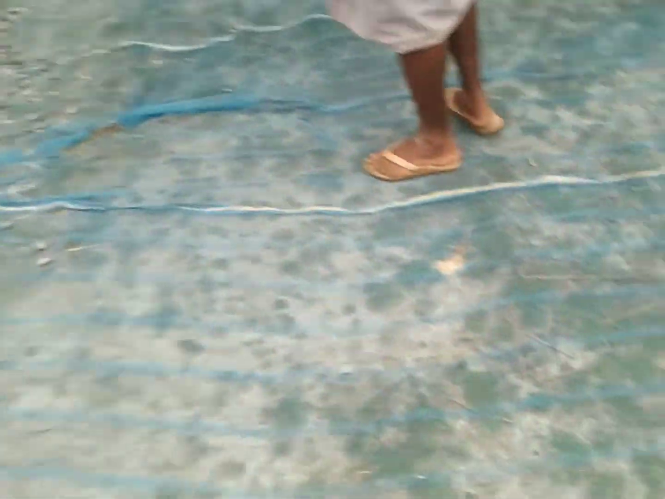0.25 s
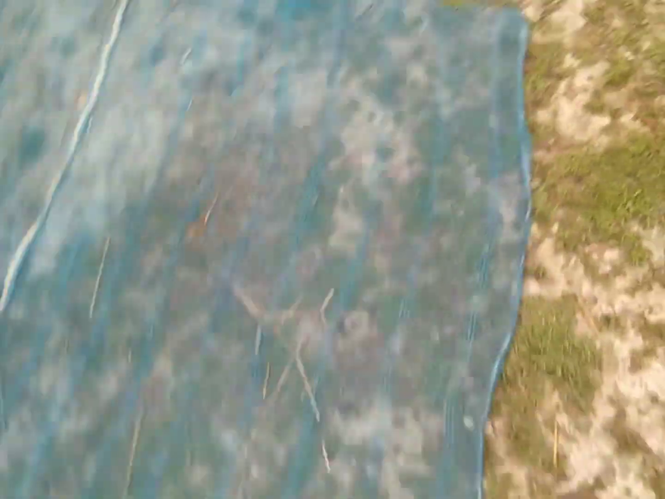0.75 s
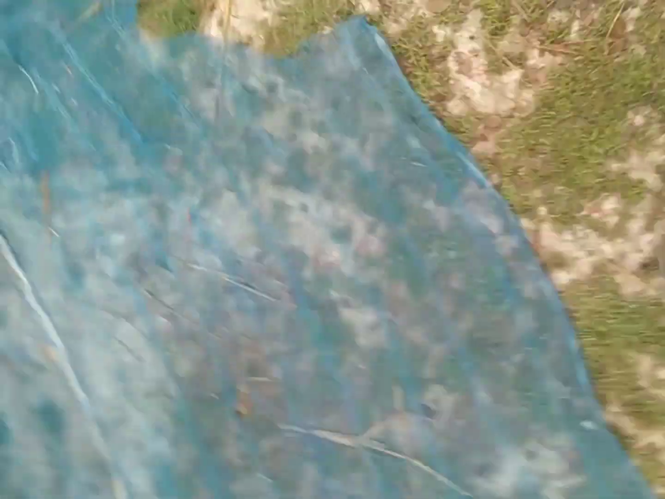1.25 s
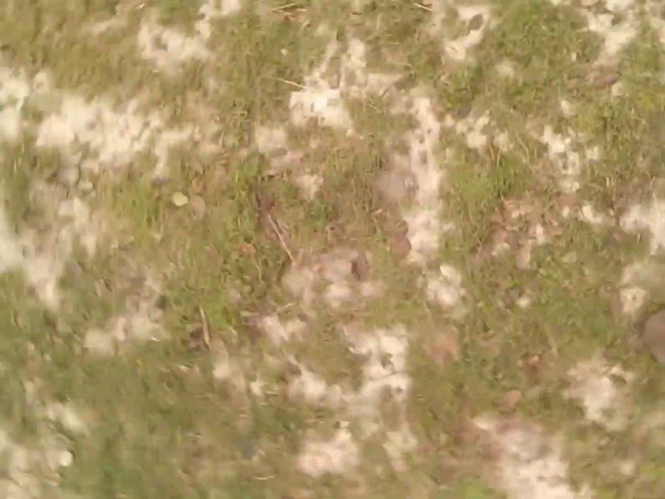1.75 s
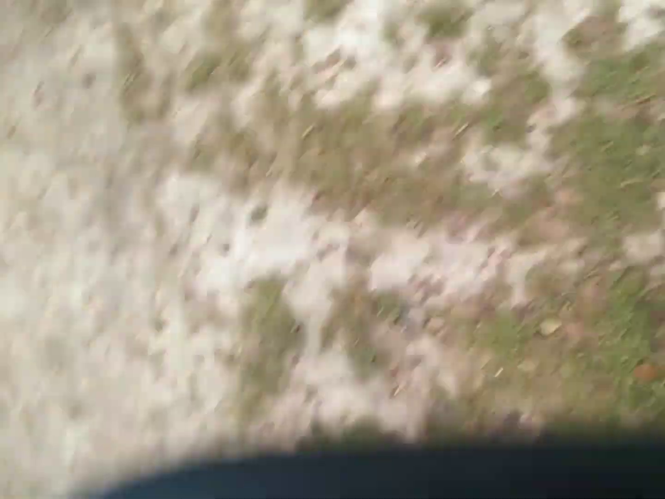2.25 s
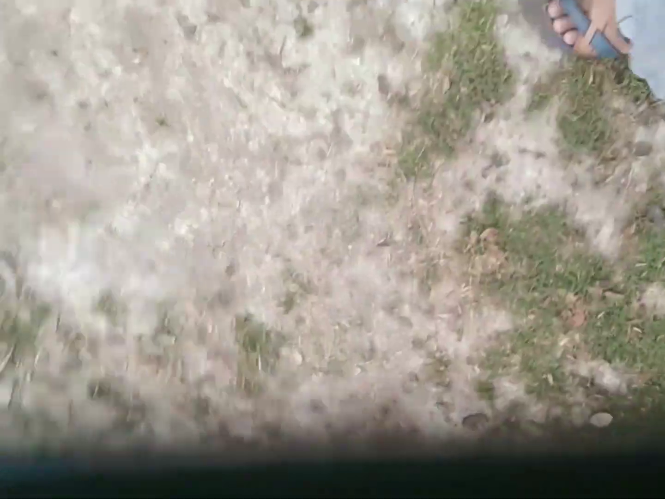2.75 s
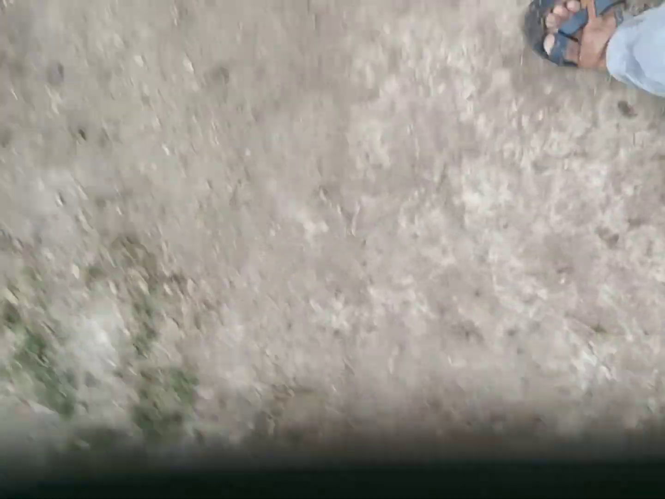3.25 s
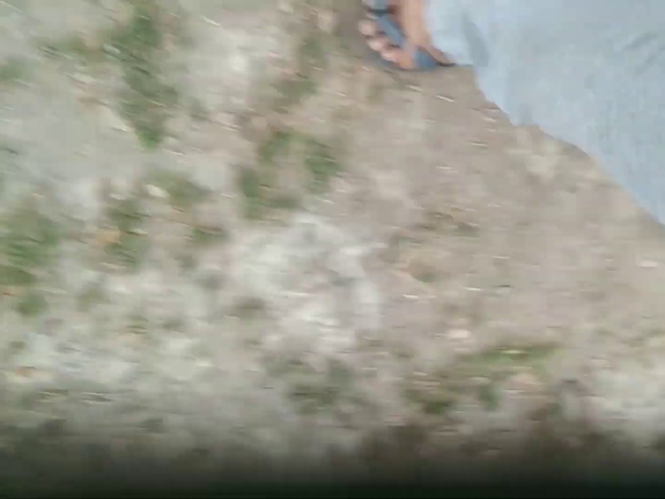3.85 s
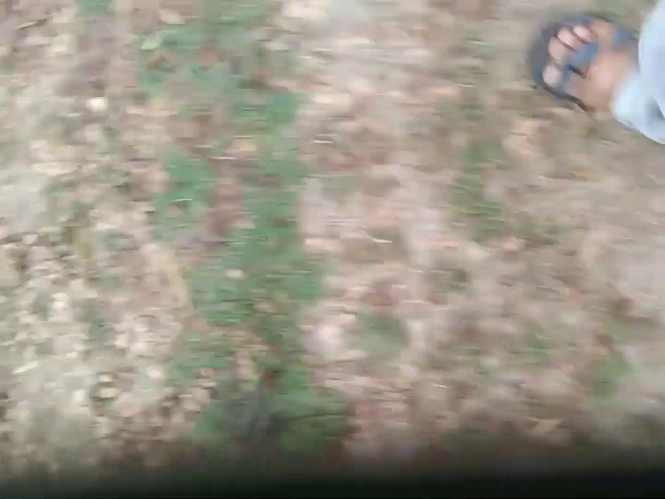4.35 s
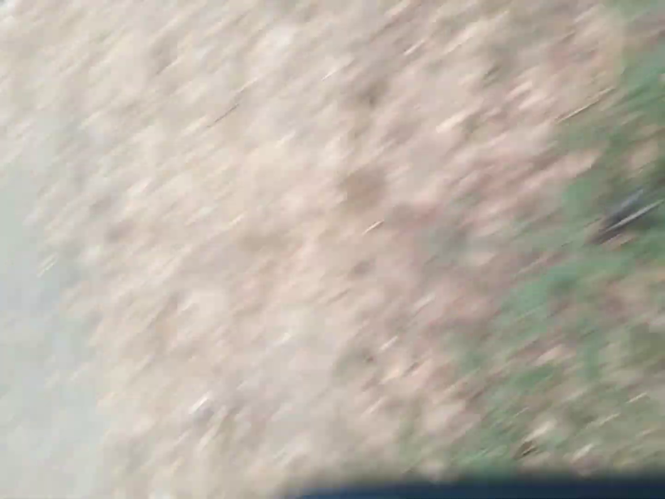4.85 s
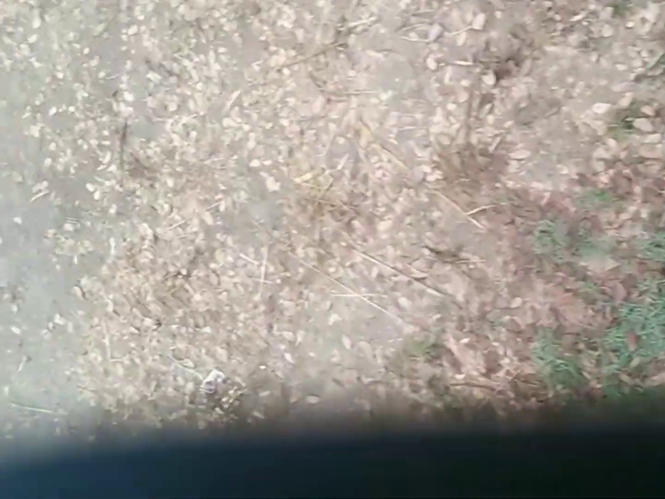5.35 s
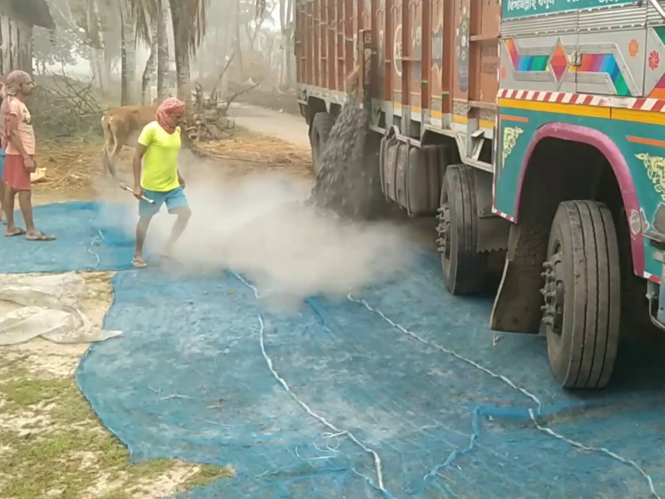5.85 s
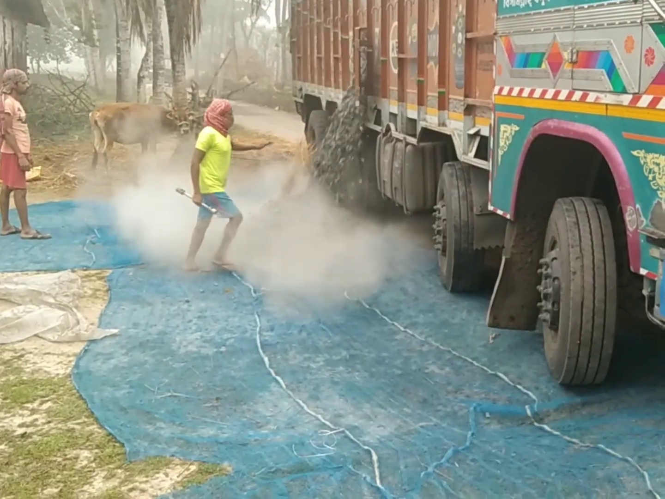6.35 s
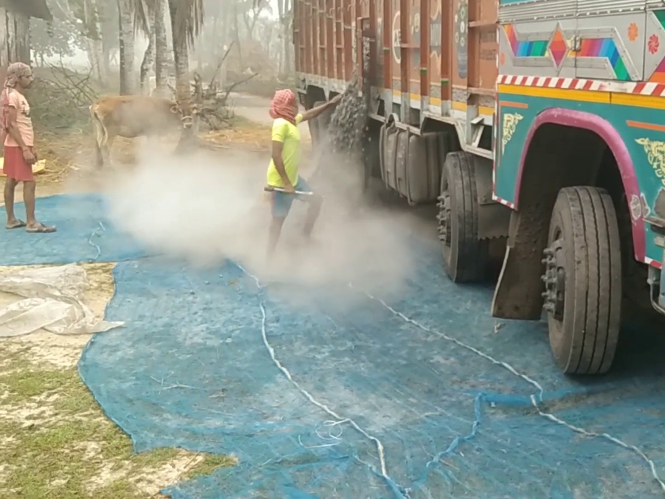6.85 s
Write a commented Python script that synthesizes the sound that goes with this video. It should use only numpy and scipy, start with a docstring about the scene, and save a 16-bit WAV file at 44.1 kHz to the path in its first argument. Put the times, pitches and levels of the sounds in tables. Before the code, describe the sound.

Outdoors, crushed stone pours from a truck's side with a dense gritty hiss over a duller rattle. Close chips tick sharply at first. The phone is carried along pointing down, so a hand muffles and hollows the hiss, with low bumps and dull clatters. It brightens briefly near five seconds, dims, and cuts to a tiny silence. Then the pour fades in quickly, steady, bright and much louder.

```python
"""A dense hiss of colliding chips over a duller rattle: crushed stone pours off a truck's side onto a pile outdoors.
A phone is carried past it, pointing down; the hand shades its microphone, sweeps notches through the hiss and bumps it.
After a short silence the pour fades in again, heard steadily from beside the cab.
The stone is made of many short random rings over noise, filtered; rumble and midrange swells are filtered noise,
close chips are decaying sines with a crack, and bumps are low swells of a few cycles."""
import sys
import numpy as np
from scipy import signal
from scipy.fft import rfft, irfft, next_fast_len
from scipy.io import wavfile
from scipy.ndimage import uniform_filter1d, map_coordinates

SR = 44100
rng = np.random.default_rng(int(sys.argv[2]) if len(sys.argv) > 2 else 0)


def waveform_to_disk(signal):
    """Save audio, clipped to [-1, 1], as 16-bit WAV at the path in sys.argv[1]."""
    frames = np.transpose(np.atleast_2d(signal))
    scaled = np.clip(frames, -1, 1) * 32767
    samples = np.round(scaled).astype(np.int16)
    wavfile.write(sys.argv[1], SR, samples)


N = 313551
T = np.arange(N) / SR  # s

# the hiss brightens when the microphone turns to the stream: start_s, upper_over_lower_hiss_db
AIM_CURVE = [(0, -0.5), (.48, 2), (1.05, -3.5), (1.8, -2), (2.6, 0), (4.58, -3), (4.9, 3), (5.2, -0.5),
             (5.77, 0.5)]


def amp(db):
    """Decibels to gain."""
    return 10 ** (np.asarray(db) / 20)


def unit(x):
    """Scale to rms 1."""
    return x / np.sqrt(np.mean(x ** 2) + 1e-20)


def along(points, hz):
    """Read (Hz, value) points on a log frequency axis."""
    point_hz, values = np.transpose(points)
    return np.interp(np.log(hz + 1), np.log(point_hz + 1), values)


def curves(rows, at):
    """Each column after the time, read at the given times."""
    s, *columns = np.transpose(rows)
    return [np.interp(at, s, column) for column in columns]


def wobble(rate):
    """A smooth random curve, rate knots a second."""
    return map_coordinates(rng.standard_normal(4096), [T * rate], mode="wrap")


def coloured(x, gain_db):
    """Filter x by a function from Hz to dB."""
    size = next_fast_len(N + SR // 4)
    gain = amp(gain_db(np.fft.rfftfreq(size, 1 / SR)))
    return irfft(rfft(x, size) * gain, size)[:N]


def add(track, s, sound):
    """Mix a short sound into the track at s seconds."""
    part = track[max(0, round(s * SR)):][:len(sound)]
    part += sound[:len(part)]


def collisions(top_hz, t60, spread_db, blur_db, count, size):
    """Stone on stone: brief rings of random pitch and strength over a noise blur of countless weaker ones."""
    when, pitch = rng.random((count, 2)).T
    strength = amp(spread_db * np.minimum(rng.standard_normal(count), 2.7))
    t = np.arange(size) / SR
    decays = np.outer(strength, amp(-60 * t / t60))
    rings = np.sin(2 * np.pi * top_hz * np.outer(pitch, t)) * decays
    index = (when * N).astype(int)[:, None] + np.arange(size)
    near = np.bincount(index.ravel(), rings.ravel(), N)[:N]
    blur = amp(blur_db) * rng.standard_normal(N)
    return unit(unit(near) + blur)


def pour_walking():
    """Stone slides in clumps: heavy pieces rattle, small chips hiss, grit fizzes; more exposure is brighter."""
    # how openly the stream reaches the carried microphone, as the level of its hiss: start_s, level_db
    exposure = [(0, -19.5), (.63, -21.5), (.85, -18.5), (1.1, -24), (1.35, -31), (1.53, -28.5),
                (2.05, -36.5), (2.27, -26), (2.75, -26.5), (2.85, -31.5), (3.02, -29), (3.38, -37.5),
                (3.83, -38), (3.96, -40.5), (4.75, -35), (4.89, -22.5), (5.09, -21), (5.76, -35)]
    # sound of the heavy pieces, which bends round the hand: start_s, level_db before a small trim
    rattle_level = [(-0.0, -37.5), (0.38, -39.5), (0.66, -33), (1.33, -37), (2.19, -34), (2.77, -37.5),
                    (3.18, -45), (3.87, -38.5), (4.35, -42.5), (4.55, -32), (4.83, -35.5), (5.13, -31.5),
                    (5.76, -43.5)]
    # brief gushes of small chips: centre_s, rise_db, half_length_s
    gushes = [(4.274, 6, 0.021), (4.578, 6.5, 0.077), (4.912, 3.5, 0.013), (5.042, 2, 0.022),
              (5.434, 2.5, 0.059)]
    # spectral shapes of heavy pieces, small chips and grit: pitch_hz, relative_db per Hz
    rattle_shape = [(25, -53.5), (60, -7.5), (120, -11), (220, -5), (450, 0), (750, -0.5), (1050, -1),
                    (1600, -1.5), (2100, -7), (2700, -4.5), (3600, -13.5), (6000, -44)]
    hiss_shape = [(600, -44), (1500, -16.5), (2500, -6.5), (3300, -3.5), (4200, -1), (5200, 1.5),
                  (6500, 2.5), (7800, 3.5), (8700, -3.5), (9800, -15.5), (11500, -21), (14000, -48)]
    fizz_shape = [(7000, -29), (9000, 4.5), (10500, -1.5), (12000, -7), (13500, -10.5), (15400, -13.5)]
    half_shaded_db = -29.5  # the exposure at which the grit's level is given
    # fine grit is shaded first: its level (dB), dB per dB of exposure, dB per dB of aim
    fizz_level_db, fizz_grows, fizz_aimed = -43.5, 1.18, 0.85
    rattle_trim_db = 0.04

    exposure_db, = curves(exposure, T)
    rattle_db, = curves(rattle_level, T)
    aim_db, = curves(AIM_CURVE, T)
    gush_db = sum(db * np.exp(-((T - s) / length) ** 2) for s, db, length in gushes)
    fizz_db = fizz_level_db + fizz_grows * (exposure_db - half_shaded_db) + fizz_aimed * aim_db
    clumps_db = 0.42 * wobble(26) + 1.09 * wobble(85)

    heavy = collisions(4920, t60=0.0047, spread_db=5.0, blur_db=9.5, count=5000, size=300)
    small = collisions(15300, t60=0.0021, spread_db=4.0, blur_db=8.5, count=16000, size=96)
    grit = collisions(15300, t60=0.0029, spread_db=12, blur_db=6.0, count=9000, size=160)
    rattle = amp(rattle_trim_db + rattle_db) * unit(coloured(heavy, lambda hz: along(rattle_shape, hz)))
    hiss = amp(exposure_db) * unit(coloured(small, lambda hz: along(hiss_shape, hz)))
    fizz = amp(fizz_db) * unit(coloured(grit, lambda hz: along(fizz_shape, hz)))
    return past_hand(amp(clumps_db) * (rattle + amp(gush_db) * (hiss + fizz)))


def past_hand(x):
    """The hand cuts a comb of notches and adds two hollow resonances; echoes off ground and truck shift."""
    # the hand closes in, draws off and closes in again: start_s, first_notch_hz, depth_scale_db
    hand = [(0, 3280, 4), (.57, 3100, 2.5), (.78, 3560, 8), (.97, 3450, 8.5), (1.1, 2850, 9),
            (1.25, 2450, 4.5), (1.5, 2510, 2), (1.8, 3130, 5), (2.4, 1680, -0.5), (4.2, 1380, -1.5),
            (4.55, 1540, 3.5), (4.95, 1690, 4), (5.33, 2270, 5.5), (5.77, 2350, 4.5)]
    # its comb, positive shares being peaks: multiple_of_first_notch, share_of_depth, width_in_multiples
    comb_teeth = [(.97, -1.22, .15), (1.44, 0.31, .21), (2.01, -0.81, .19), (2.62, 0.53, .2)]
    # the hollow of the palm: start_s, resonance_hz, gain_db
    palm = [(0, 1150, 7), (.63, 1250, 3.5), (.81, 740, 2.5), (1.63, 910, 6), (2.2, 834, 6.5),
            (2.7, 765, -0.5), (3.05, 1175, 6), (3.72, 1180, 6), (3.86, 620, 5.5), (4.2, 785, 5),
            (5.13, 713, 5), (5.77, 800, 8)]
    # the finger gap's resonance (Hz), its gain (dB), and the dB it loses per dB of the palm's
    gap_hz, gap_open_db, gap_closes = 1920, 8.5, 1.27
    # notch of the ground echo: it rises and fades as the phone tips down
    ground_hz, ground_hz_per_s, ground_db, ground_fade_s = 630, 400, -6.5, 1

    hz, s, spectrum = signal.stft(x, SR, nperseg=1024)
    hz = hz[:, None]
    bell = lambda distance: np.exp(-distance ** 2)

    notch_hz, depth_db = curves(hand, s)
    teeth = sum(share * bell((hz / notch_hz - place) / width) for place, share, width in comb_teeth)
    comb = depth_db * teeth

    palm_hz, palm_db = curves(palm, s)
    gap_db = gap_open_db - gap_closes * palm_db
    hollow = palm_db * bell((hz - palm_hz) / 120) + gap_db * bell((hz - gap_hz) / 280)

    aim_db, = curves(AIM_CURVE, s)
    brightness = aim_db * (bell((hz - 7700) / 1700) - bell((hz - 4000) / 1300))

    ground_notch = bell((hz - ground_hz - ground_hz_per_s * s) / 200)
    ground = ground_db * bell(s / ground_fade_s) * ground_notch

    # many weak echoes add up to drifting patches of gain, deepest in the midrange
    patches = uniform_filter1d(rng.standard_normal(spectrum.shape), size=3, axis=0)
    patches = unit(uniform_filter1d(patches, size=13, axis=1))
    echoes = patches * along([(300, 1.8), (1500, 2.4), (6000, 1.3)], hz)

    gain = amp(comb + hollow + brightness + ground + echoes)
    return signal.istft(spectrum * gain, SR, nperseg=1024)[1][:N]


def handling():
    """The carried phone rumbles softly in the grip: low filtered noise under a level curve."""
    # rumble swelling as the phone swings: start_s, level_db before the trim
    rumble_level = [(0.0, -61.5), (2.0, -45.5), (3.29, -58), (4.75, -46.5), (5.49, -56.5), (5.76, -65)]
    # its spectral shape: pitch_hz, relative_db per Hz
    rumble_shape = [(20, -31), (45, -9), (75, 0.5), (130, 3.5), (220, -1.5), (500, -58)]
    trim_db = 1.5
    level_db, = curves(rumble_level, T)
    rumble = coloured(rng.standard_normal(N), lambda hz: along(rumble_shape, hz))
    return amp(trim_db + level_db) * unit(rumble)


def clatters():
    """A quick run of dull, hollow contacts that dies away."""
    # hollow clatters: start_s, level_db, t60_s
    runs = [(.1, -35, .17), (1.825, -41, 0.25), (1.955, -33, 0.27), (4.316, -26.5, 0.22)]
    # spectral shape of the contacts: pitch_hz, relative_db per Hz
    hollow_shape = [(100, -25), (300, -2), (480, 4), (850, -1.5), (1400, -4), (2000, -2.5), (2350, -24),
                    (6000, -66)]
    envelope = np.zeros(N)
    t = np.arange(SR // 3) / SR
    for s, db, t60 in runs:
        attack = 1 - np.exp(-t / 0.0011)
        decay_db = -60 * np.maximum(t - .015, 0) / t60  # held for 15 ms first
        add(envelope, s, amp(db + decay_db) * attack)
    contacts = collisions(3460, t60=0.0042, spread_db=-1.5, blur_db=9.5, count=4000, size=300)
    return envelope * unit(coloured(contacts, lambda hz: along(hollow_shape, hz)))


def pings(rows, t60, crack):
    """A struck chip gives a sharp noise crack and a short sine ring, both dying exponentially."""
    out = np.zeros(N)
    t = np.arange(SR // 10) / SR
    for s, db, hz in rows:
        snap = crack * amp(-60 * t / 0.0084) * rng.standard_normal(len(t))
        ring = np.sin(2 * np.pi * hz * t) * amp(-60 * t / t60)
        add(out, s, amp(db) * (ring + snap))
    return coloured(out, lambda hz: along([(1000, -31), (4000, -2), (9000, 11.5), (12000, -10.5)], hz))


def midrange_swells():
    """Brief swells of midrange noise, like short gritty brushes within the pour."""
    # the swells: centre_s, level_db, half_length_s
    swells = [(0.653, -28, .015), (2.192, -30.5, .025), (2.542, -33, .03), (3.009, -32.5, 0.0064),
              (4.515, -31.5, 0.028)]
    envelope = sum(amp(db) * np.exp(-((T - s) / length) ** 2) for s, db, length in swells)
    midrange_shape = [(400, -23), (1300, 4), (2700, 15.5), (4200, -3), (8000, -26)]  # Hz, relative dB
    noise = coloured(rng.standard_normal(N), lambda hz: along(midrange_shape, hz))
    return envelope * unit(noise)


def bumps():
    """Steps and shifting fingers push the phone: a low swell of a few uneven cycles."""
    # soft bumps on the phone: crest_s, peak_db, pitch_hz, half_length_s
    pushes = [(1.148, -32.5, 92.5, 0.02), (1.234, -40, 74.5, .025), (1.458, -38, 96, 0.0052),
              (1.643, -30.5, 120, .012), (1.676, -25.5, 172, 0.0082), (1.69, -27, 79, 0.015),
              (1.976, -26, 117, 0.0035), (2.881, -31, 88.5, .012), (2.917, -22, 108, 0.012),
              (4.296, -36, 118, 0.021)]
    out = np.zeros(N)
    t = np.arange(-SR // 10, SR // 10) / SR
    knots = np.linspace(t[0], t[-1], 32)
    for s, db, hz, length in pushes:
        unevenness = .6 * np.interp(t, knots, rng.standard_normal(32))  # radians
        phase = 2 * np.pi * hz * t + unevenness
        add(out, s + t[0], amp(db) * np.cos(phase) / np.cosh(1.46 * t / length))
    return out


def pour_standing():
    """In plain view the stream is even and bright, coloured by fixed reflections."""
    # spectral shape of the unshaded stream: pitch_hz, relative_db per Hz
    open_shape = [(25, -55), (55, -31), (110, -21), (220, -19.5), (520, -23), (1000, -15.5), (1400, -16.5),
                  (2200, -9), (3300, -9.5), (4000, -3.5), (5300, -3.5), (7800, -2), (12000, -19),
                  (15400, -20)]
    # bands that ground and truck side reinforce: centre_hz, width_hz, gain_db
    reinforced = [(340, 200, 9), (780, 210, 7.5), (3800, 120, 4), (6450, 940, 6), (9560, 350, 1),
                  (10200, 370, 4.5)]

    def reflections(hz):
        """Sum of resonance-shaped boosts in dB."""
        return sum(db / (1 + (2 * (hz - centre) / width) ** 2) for centre, width, db in reinforced)

    stream = collisions(16100, t60=0.0025, spread_db=1.5, blur_db=8.5, count=18000, size=96)
    stream = unit(coloured(stream, lambda hz: along(open_shape, hz) + reflections(hz)))
    level_db = -18 + 0.47 * wobble(27) + 0.49 * wobble(110)
    return stream * amp(level_db)


def scene():
    """The walk, a short silence, then the pour from beside the cab; one microphone feeds both channels."""
    # single chips landing close by: start_s, level_db before colouring, pitch_hz
    chips = [(.386, -9, 8300), (.4165, -8, 7600), (.491, -9, 7600), (.5876, -15, 7800), (.692, -12, 5750),
             (.805, -12, 7000), (.819, -13, 5200), (.832, -3, 5000), (.991, -19, 5000), (3.755, -21, 11500),
             (4.402, -25, 7200), (4.5466, -16, 6400), (4.6668, -19, 6600), (4.906, -10, 6600)]
    # thin high tinkles: start_s, level_db before colouring, pitch_hz
    tinkles = [(.775, -18, 14650), (.822, -7, 14400), (1.045, -18, 15100), (1.085, -21, 14750)]
    pause_s, resume_s, fade_in_s = 5.776, 5.856, 0.23
    stone = pour_walking() + pings(chips, t60=0.0027, crack=0.2) + pings(tinkles, t60=.028, crack=.08)
    walk = stone + handling() + bumps() + clatters() + midrange_swells()
    fade_out = np.clip((pause_s - T) / .003, 0, 1)
    # the fade-in starts a little above silence
    fade_in = np.clip(0.078 + (T - resume_s) / fade_in_s, 0, 1) * (T > resume_s)
    mono = walk * fade_out + pour_standing() * fade_in
    return np.array([mono, mono])


def record(dry):
    """The phone's band limit: everything above it is cut by 120 dB."""
    top_hz = 15600
    return np.array([coloured(x, lambda hz: -120 * (hz > top_hz)) for x in dry])


dry = scene()
out = record(dry)
waveform_to_disk(out)
```